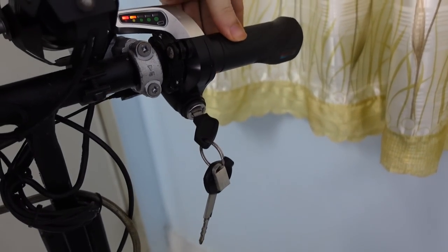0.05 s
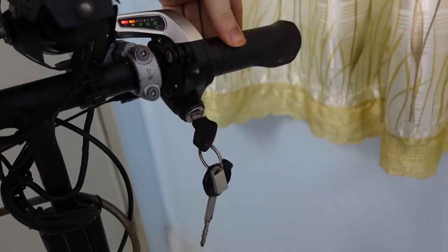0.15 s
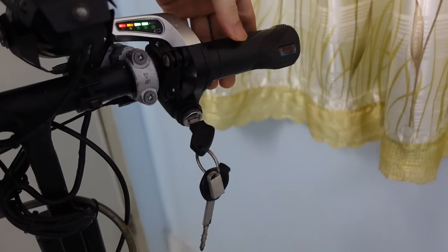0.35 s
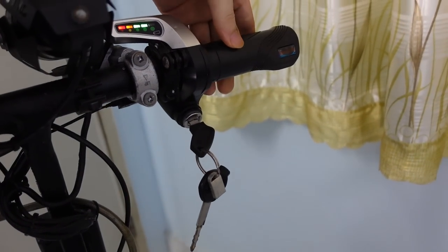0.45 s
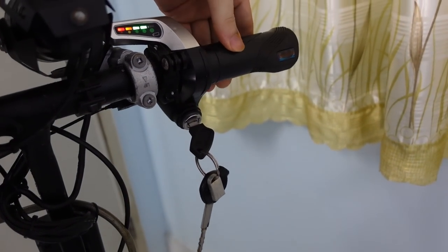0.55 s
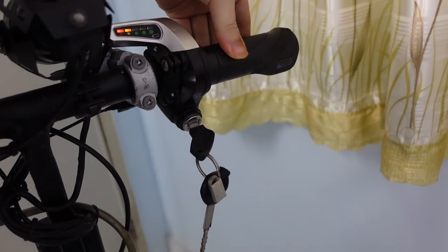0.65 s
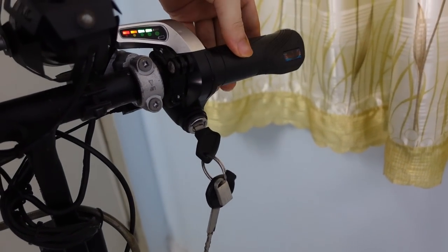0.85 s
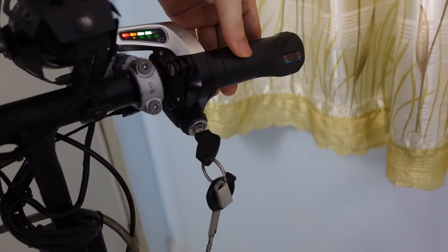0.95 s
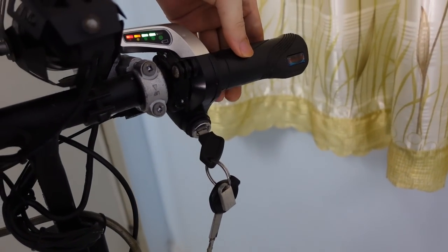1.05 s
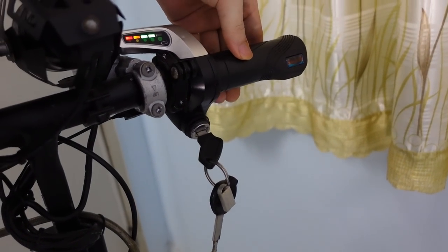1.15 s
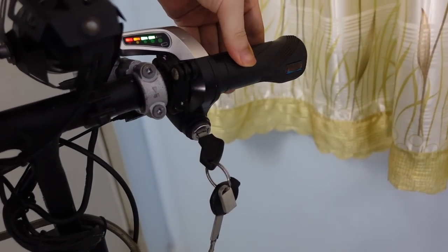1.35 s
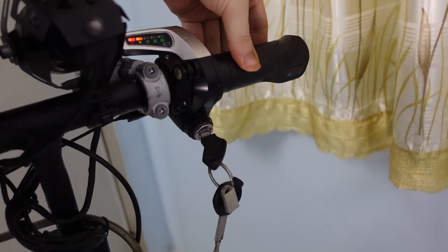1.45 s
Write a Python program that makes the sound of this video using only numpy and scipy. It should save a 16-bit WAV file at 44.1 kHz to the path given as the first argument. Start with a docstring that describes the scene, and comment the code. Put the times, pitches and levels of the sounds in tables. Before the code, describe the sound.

Electric scooter chain drive, close up in a small quiet room: a fading rattle, then two short motor surges with knocks, metallic chatter and hollow frame drone, each coasting down, and a third just starting.

```python
"""First a low drone and a rattle run down over quiet room tone: the wheel of a homemade electric scooter,
running free in a small room. Two blips of throttle follow, and a third begins at the end.
Each blip takes up the slack of the drive with knocks, spins it up for a fifth of a second and lets it coast.
Chain links strike the sprocket at a rate that follows the speed: the frame drones, the steel rattles,
both louder the faster it runs. The motor growls while it pulls, and the swinging chain slaps the frame."""
import sys
import numpy as np
from scipy import signal
from scipy.fft import rfft, irfft
from scipy.io import wavfile

SR = 44100
rng = np.random.default_rng(int(sys.argv[2]) if len(sys.argv) > 2 else 0)


def store_pcm(level_fs):
    """Save levels as 16-bit WAV."""
    pcm = np.round(np.clip(level_fs, -1, 1) * 32767).astype(np.int16)
    wavfile.write(sys.argv[1], SR, np.atleast_2d(pcm).T)


N = 66150
# A tenth of a second of run-in before time 0 lets the filters settle; it is cut off at the end.
TIME = np.arange(-(SR // 10), N) / SR
SIZE = len(TIME)
REFERENCE_SPEED_HZ = 300  # links per second at which the speed-following layers have their stated level


def from_db(db):
    """Turn decibels into a gain."""
    return 10 ** (np.asarray(db) / 20)


def rms_one(x):
    """Scale to an rms level of one."""
    return x / np.sqrt(np.mean(x ** 2) + 1e-20)


def colour(x, points):
    """Filter through (frequency, level) points without pre-echo (minimum phase), at unit power gain."""
    hz, db = np.transpose(points)
    half = 4096
    grid_hz = np.linspace(1, SR / 2, half + 1)
    gain = rms_one(from_db(np.interp(np.log(grid_hz), np.log(hz), db)))
    # Folding the cepstrum moves all of the filter's response after its start.
    cepstrum = irfft(np.log(gain))
    cepstrum[1:half] *= 2
    cepstrum[half + 1:] = 0
    response = irfft(np.exp(rfft(cepstrum)))[:half]
    return signal.fftconvolve(x, response)[:SIZE]


def resonate(x, modes):
    """Add up parallel resonances, with dark valleys between them and unit power gain in all."""
    out, power = 0, 0
    for hz, width, db in modes:
        r = np.exp(-np.pi * width / SR)  # a narrower resonance rings longer
        top = (1 - r * r) / 2
        poles = [1, -2 * r * np.cos(2 * np.pi * hz / SR), r * r]
        out = out + from_db(db) * signal.lfilter([top, 0, -top], poles, x + 1e-18)
        power += top * from_db(db) ** 2
    return out / np.sqrt(power)


def linger(power, decay_s):
    """Spread sound power over an exponential tail whose amplitude falls to 1/e in decay_s."""
    r = np.exp(-2 / (decay_s * SR))
    return signal.lfilter([1 - r], [1, -r], power + 1e-18)


ROOM_T60_S, ROOM_DB = 0.16, 0.5  # time to fall by 60 dB; power of the tail against the direct sound


def noise_in_room(power):
    """Make noise of the given power and add the room's short diffuse tail."""
    tail = from_db(ROOM_DB) ** 2 * linger(power, ROOM_T60_S / np.log(1000))
    return np.sqrt(power + tail) * rng.standard_normal(SIZE)


def blow(s, db, hz, rise_s):
    """Strike the frame: one resonance swells for rise_s and dies within a few cycles."""
    out = np.zeros(SIZE)
    ringing = (TIME > s) & (TIME < s + 10 * rise_s)
    age = TIME[ringing] - s
    swell = age / rise_s * np.exp(1 - age / rise_s)  # peaks at one
    out[ringing] = from_db(db) * swell * np.sin(2 * np.pi * hz * age)
    return out


# Colour of the quiet room: (frequency [Hz], relative level [dB per Hz])
ROOM_COLOUR = [(20, -3.5), (26, 3), (33, -16), (42, -10), (55, 9), (70, -9), (90, -5.5), (200, -9.5),
               (500, -15), (1000, -26.5), (3000, -34.5), (15000, -45)]
ROOM_TONE_DB = -50.5


def room_tone():
    """Steady coloured noise is the background of the room."""
    return from_db(ROOM_TONE_DB) * colour(rng.standard_normal(SIZE), ROOM_COLOUR)


# Speed of the drive over time: (time [s], links meeting the sprocket [Hz])
DRIVE_SPEED = [(-.1, 117.3), (0, 56.3), (.04, 25.1), (.07, 4), (.112, 2.97), (.14, 34.8), (.155, 89.2),
               (.185, 123.4), (.22, 190.5), (.285, 335), (.335, 261), (.39, 228), (.50, 138), (.58, 110.3),
               (.65, 50.2), (.705, 35.15), (.775, 120.7), (.815, 200), (.865, 255.3), (.92, 389),
               (.96, 325), (1.02, 249), (1.08, 200), (1.16, 182), (1.25, 84.8), (1.32, 62.4), (1.365, 29),
               (1.405, 3), (1.456, 3), (1.5, 49)]


def drive_speed():
    """Draw straight lines between the speed points, never below one link a second."""
    return np.maximum(np.interp(TIME, *np.transpose(DRIVE_SPEED)), 1)


LINK_JITTER, LINK_SPREAD_DB = .16, 2.5  # unevenness in time (in links) and in strength


def link_strikes(speed):
    """Click once a link, uneven in time and strength; mean power about one above 20 links a second."""
    travel = np.cumsum(speed) / SR  # links passed so far
    chance = rng.standard_normal((500, 2))[:int(travel[-1])]
    link = np.arange(len(chance)) + .5 + LINK_JITTER * chance[:, 0]
    at = np.clip(np.searchsorted(travel, link), 0, SIZE - 1)
    strength = rms_one(from_db(LINK_SPREAD_DB * np.clip(chance[:, 1], -2, 2)))
    clicks = np.zeros(SIZE)
    # Crowded clicks are made smaller, so that speed alone does not change the power.
    clicks[at] = strength * np.sqrt(SR / np.maximum(speed[at], 20))
    return clicks


# Resonances of frame and deck: (frequency [Hz], width [Hz], relative level [dB])
FRAME_MODES = [(108.7, 8.4, -14.5), (200.6, 15.3, -6.5), (282.6, 18, -18), (337, 4.7, -7.5),
               (391.4, 6, -2.5), (416, 29, -5), (473.5, 17, 3), (504.3, 18, 3), (546.4, 19, 3.5),
               (580.7, 9.1, -0.5), (662, 9.5, -5), (697, 6.5, 0), (781, 14, -9)]


def through_frame(x):
    """Colour a tone by the resonances of the frame, keeping its overall level."""
    return rms_one(resonate(x, FRAME_MODES)) * np.sqrt(np.mean(x ** 2))


# Thinner panels, which hum on even at low speed: (frequency [Hz], width [Hz], relative level [dB])
PANEL_MODES = [(501.5, 22, 4), (577.7, 19.5, 1), (709.7, 17, 3.5), (789, 17, -6.5)]
# Harmonics of the link rate, from the first upwards: (relative level [dB])
MESH_HARMONICS = [-1.5, -1, -7.5, -5, -6, -18.5]
# Each layer: level at the reference speed, power of the speed it follows, gain while the motor pulls.
TONE_DB, TONE_POWER, TONE_PULL_DB = -26.5, 1.27, 3.5
DRONE_DB, DRONE_POWER, DRONE_PULL_DB = -25.5, 1.5, 5.5  # level before the band filter
PANEL_DB, PANEL_POWER = -29, 1  # level before the band filter
FRAME_LOW_HZ, FRAME_HIGH_HZ = 263, 870


def frame_drone(clicks, speed, pull):
    """The link tone and the uneven link strikes sweep through the resonances of frame and panels."""
    phase = 2 * np.pi * np.cumsum(speed) / SR
    pace = speed / REFERENCE_SPEED_HZ
    mesh = sum(from_db(db) * np.sin((k + 1) * phase) for k, db in enumerate(MESH_HARMONICS))
    tone_level = from_db(TONE_DB + TONE_PULL_DB * pull) * pace ** TONE_POWER
    tone = through_frame(rms_one(mesh) * tone_level)
    strikes = clicks * rng.choice([-1, 1], (2, SIZE))  # random signs, separate for frame and panels
    frame_level = from_db(DRONE_DB + DRONE_PULL_DB * pull) * pace ** DRONE_POWER
    frame = resonate(strikes[0] * frame_level, FRAME_MODES)
    panels = resonate(strikes[1] * from_db(PANEL_DB) * pace ** PANEL_POWER, PANEL_MODES)
    band = signal.butter(2, [FRAME_LOW_HZ, FRAME_HIGH_HZ], "band", fs=SR, output="sos")
    return tone + signal.sosfilt(band, frame + panels)


# Broad colour of the rattle: (frequency [Hz], relative level [dB per Hz])
RATTLE_COLOUR = [(200, 3.5), (700, 6.5), (1000, 0.5), (1550, 6), (2200, -0.5), (2800, 1.5), (3100, 1),
                 (4000, -0.5), (5200, 2.5), (6800, 0), (8500, -1.5), (10500, -5), (11350, -11), (12200, -1),
                 (13300, -4), (14100, -8.5), (15500, -18)]
# Resonances of chain and sprockets: (frequency [Hz], width [Hz], relative level [dB])
STEEL_MODES = [(1030, 26, -3.5), (1162, 40, 5.5), (1317, 28, 4), (1375, 27.5, 3.5), (2548, 48, 4),
               (2698, 68, 2.5), (3547, 46, -1), (3743, 53, 2), (4088, 60, 5), (4334, 45, 2), (4570, 39, 2),
               (4810, 18, -9), (5900, 31, 7), (6157, 99, 4.5), (6277, 31, 5), (6750, 40, -1.5),
               (7350, 28, 2.5), (7757, 48, -0.5), (8420, 23, -9), (8550, 47, -5), (9530, 37, -2.5),
               (12350, 76, -14), (13600, 50, -4)]
# Level at the reference speed before loose chatter and room tail, power of the speed, gain while pulling.
RATTLE_DB, RATTLE_POWER, RATTLE_PULL_DB = -34, 1.266, 1
RING_DB, RING_POWER = -33.5, 1.42
LINK_DECAY_S, LOOSE_SHARE = 0.0016, 0.31  # fade of each burst; power of the chatter against the bursts


def chain_rattle(clicks, speed, pull):
    """Each strike is a short gritty burst that also rings the steel; loose rollers chatter in between."""
    bursts = linger(clicks ** 2, LINK_DECAY_S) + LOOSE_SHARE
    pace = speed / REFERENCE_SPEED_HZ
    grit_level = from_db(RATTLE_DB + RATTLE_PULL_DB * pull) * pace ** RATTLE_POWER
    ring_level = from_db(RING_DB) * pace ** RING_POWER
    grit = noise_in_room(bursts * grit_level ** 2)
    ring = noise_in_room(bursts * ring_level ** 2)
    return colour(grit, RATTLE_COLOUR) + resonate(ring, STEEL_MODES)


# Knocks as slack is taken up: (time [s], boom level [dB], thud level [dB], clack level [dB], clack decay [s])
SLACK_KNOCKS = [(0.111, -24, -34, -38, 0.04), (0.126, -31.5, -34, -32.5, 0.014),
                (0.72, -47, -42, -32.5, 0.054), (0.757, -46, -49, -31, 0.057), (.775, -23, -58, -32, 0.034),
                (1.456, -37, -46.5, -43.5, 0.038), (1.473, -51, -50, -41.5, .025)]
# Colour of the clack: (frequency [Hz], relative level [dB per Hz])
CLACK_COLOUR = [(60, -12), (120, 12), (200, 7.5), (300, -2.5), (700, 10), (1250, 1), (2000, -5),
                (2600, -13), (6000, -17.5), (15000, -30)]
BOOM_HZ, BOOM_RISE_S = 505, 0.0034
THUD_HZ, THUD_RISE_S = 186, 0.0059


def knocks():
    """Slack is taken up as the motor starts: a boom, a low thud and a dull clack of fading noise."""
    body, clacks = 0, 0
    for s, boom_db, thud_db, clack_db, decay in SLACK_KNOCKS:
        boom = blow(s, boom_db, BOOM_HZ, BOOM_RISE_S)
        thud = blow(s, thud_db, THUD_HZ, THUD_RISE_S)
        body = body + boom + thud
        fade = (TIME >= s) * np.exp(-np.maximum(TIME - s, 0) / decay)
        clacks = clacks + from_db(clack_db) * fade
    return body + colour(clacks * rng.standard_normal(SIZE), CLACK_COLOUR)


# Times when the motor pulls: (start [s], end [s])
MOTOR_PULLS = [(.112, .29), (.722, .92), (1.456, 1.6)]


def motor_pull():
    """The pull of the motor goes from 0 to 1 and back, with ramps of 28 ms."""
    return sum(np.clip(np.minimum(TIME - start, end - TIME) / 0.028, 0, 1) for start, end in MOTOR_PULLS)


GROWL_DB, GROWL_UNEVEN_DB = -38, 7  # level before unevenness and fade; spread from link to link
GROWL_FADE_HZ = 248  # link rate at which the growl's drive is halved; it fades further above


def motor_growl(speed, pull):
    """Under load the motor shakes the frame once a link, unevenly and hardest at low speed."""
    travel = np.cumsum(speed) / SR
    uneven = np.interp(travel, np.arange(500), rng.standard_normal(500))
    shake = pull * from_db(GROWL_UNEVEN_DB * uneven) * np.sin(2 * np.pi * travel)
    fade = 1 / (1 + (speed / GROWL_FADE_HZ) ** 4)
    return through_frame(from_db(GROWL_DB) * shake * fade)


# The running chain slaps the frame: (time [s], level [dB], pitch [Hz], rise [s])
CHAIN_SLAPS = [(.216, -14.5, 564, 0.0031), (.248, -15.5, 550, 0.0042), (.263, -32, 550, .003),
               (.287, -12.5, 544, 0.0055), (.334, -23, 565, 0.0031), (.38, -16, 474, 0.005),
               (.405, -18.5, 510, .003), (.482, -24, 501, 0.0035), (.588, -32, 483, .005),
               (.811, -14.5, 492, 0.0061), (.841, -8.5, 524, .0035), (1.003, -15.5, 539, 0.0067),
               (1.023, -17.5, 496, .004), (1.051, -18, 546, 0.0059), (1.134, -15, 489.3, 0.0034),
               (1.167, -20, 489.6, 0.0043), (1.32, -37, 718, 0.0051)]


def slaps():
    """The swinging chain makes the frame throb with short swelling blows."""
    return sum(blow(*slap) for slap in CHAIN_SLAPS)


def scene():
    """Speed and throttle drive frame, chain and motor over the room tone, with knocks and slaps on top."""
    speed, pull = drive_speed(), motor_pull()
    clicks = link_strikes(speed)
    running = frame_drone(clicks, speed, pull) + chain_rattle(clicks, speed, pull)
    mix = room_tone() + running + knocks() + motor_growl(speed, pull) + slaps()
    return mix[None, -N:]


CUTOFF_HZ = 15600


def record(dry):
    """A steep low-pass filter cuts the top of the treble."""
    low_pass = signal.ellip(12, .2, 90, CUTOFF_HZ, fs=SR, output="sos")
    return signal.sosfilt(low_pass, dry)


dry = scene()
out = record(dry)
store_pcm(out)
```